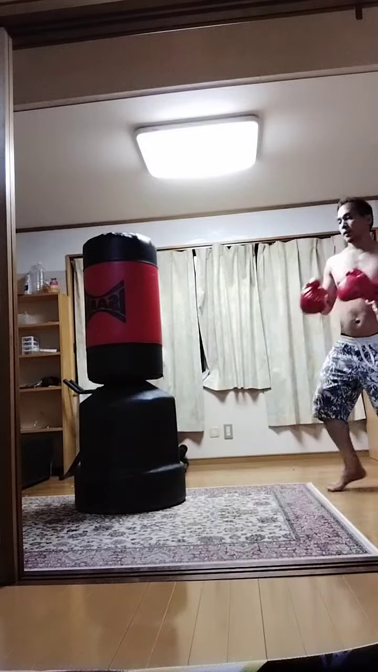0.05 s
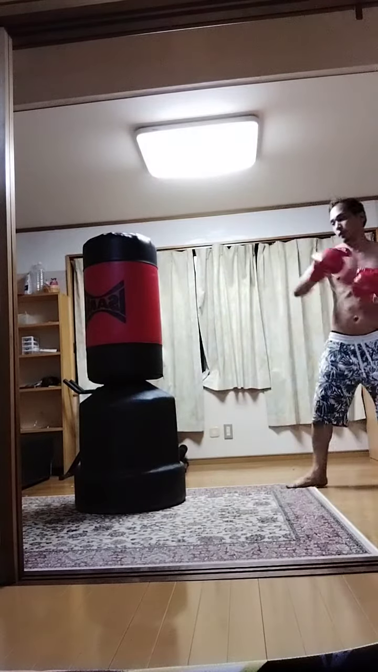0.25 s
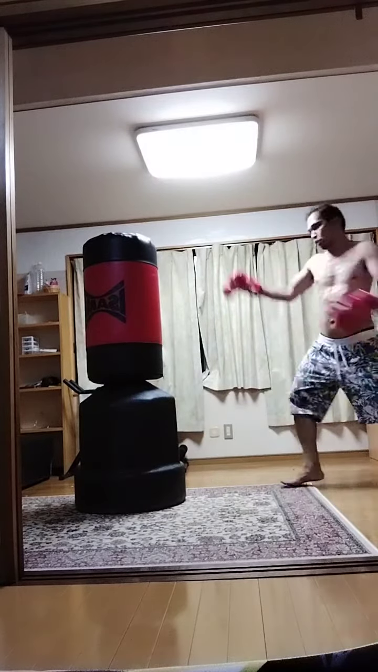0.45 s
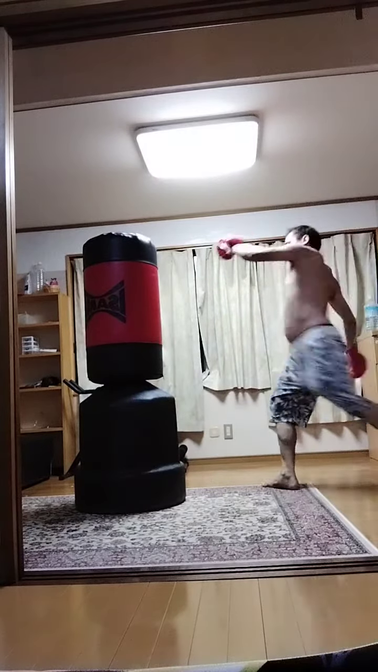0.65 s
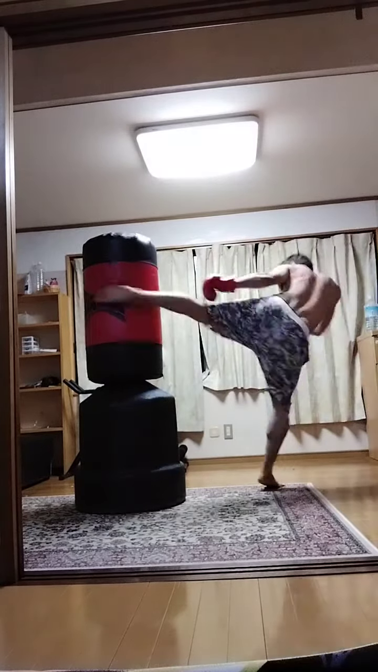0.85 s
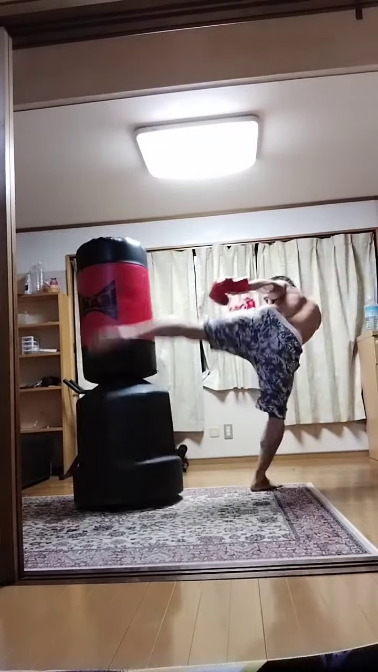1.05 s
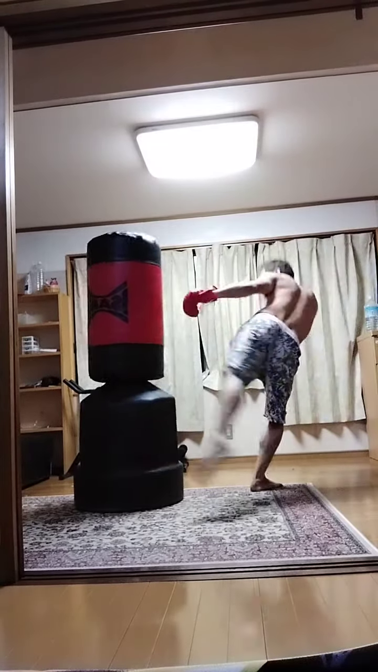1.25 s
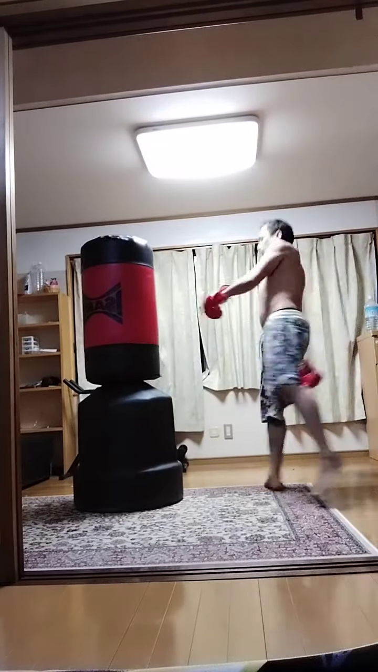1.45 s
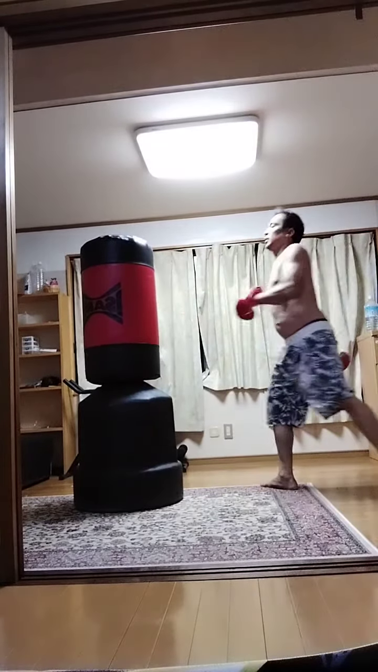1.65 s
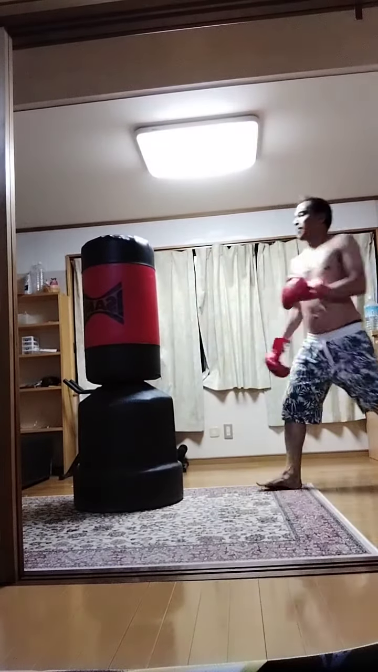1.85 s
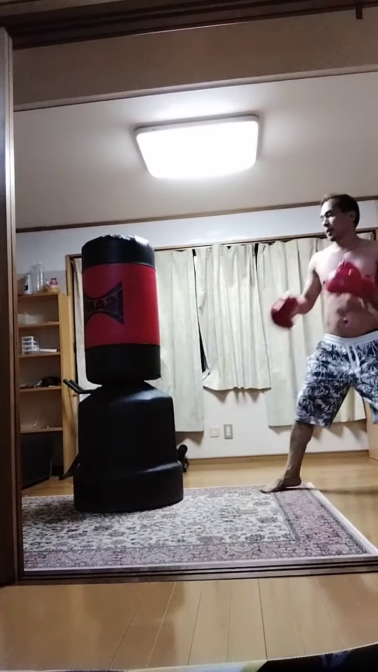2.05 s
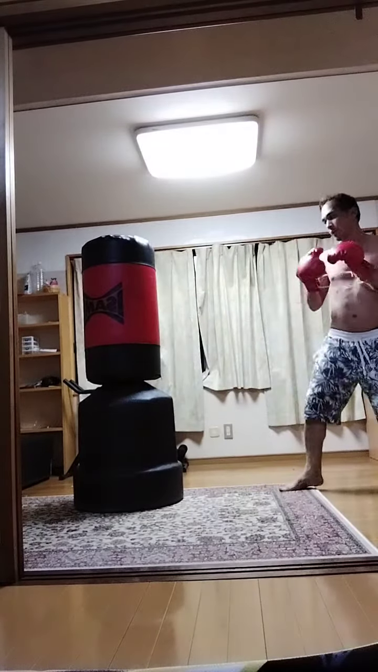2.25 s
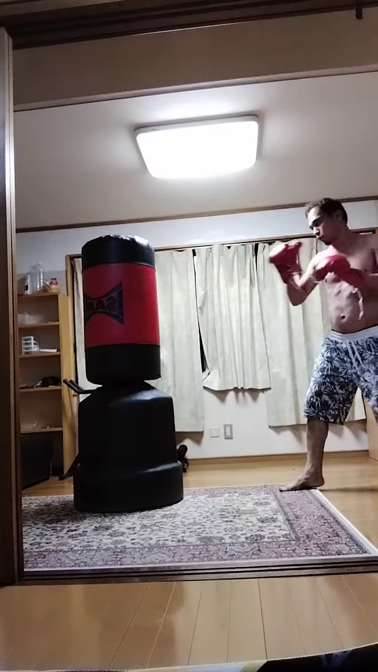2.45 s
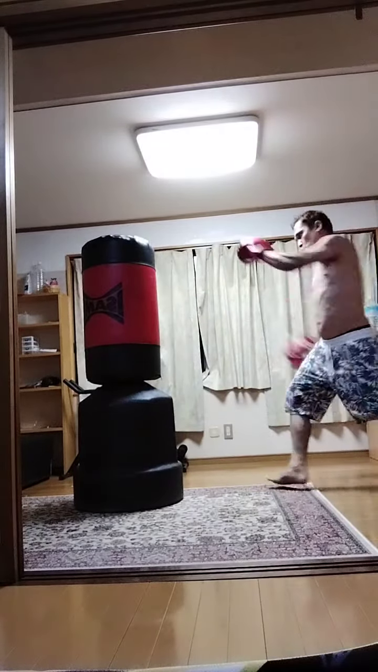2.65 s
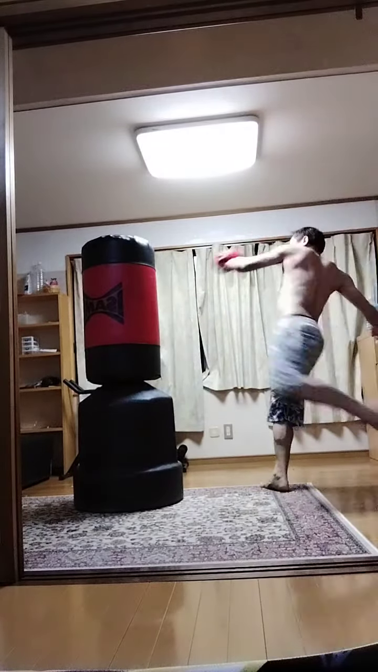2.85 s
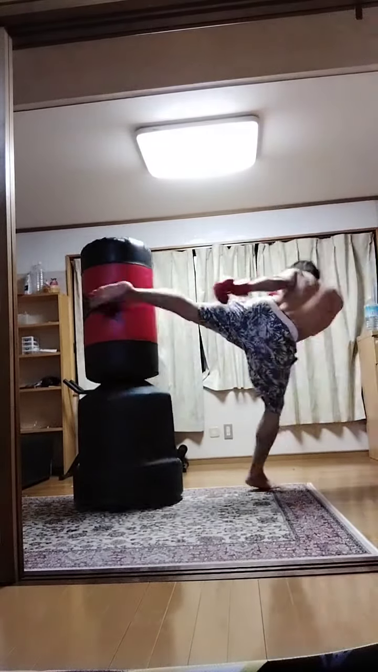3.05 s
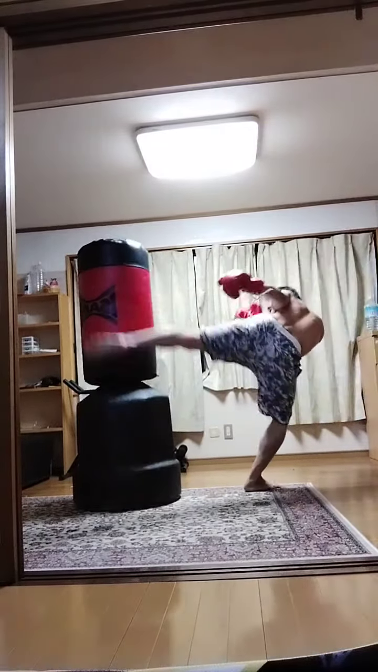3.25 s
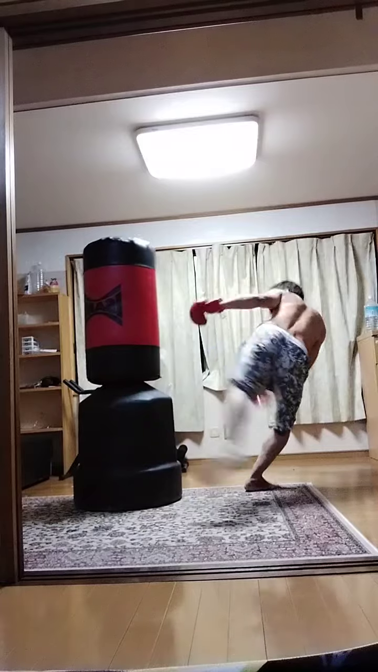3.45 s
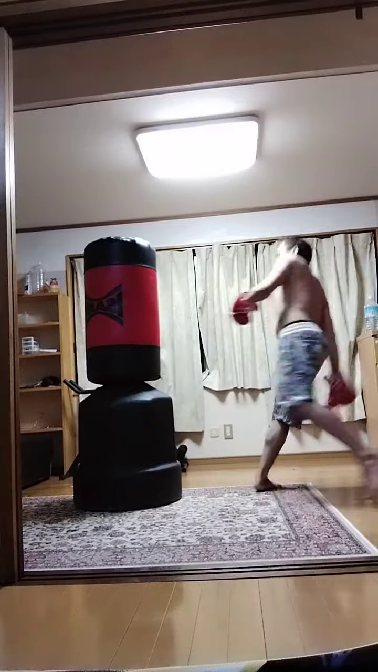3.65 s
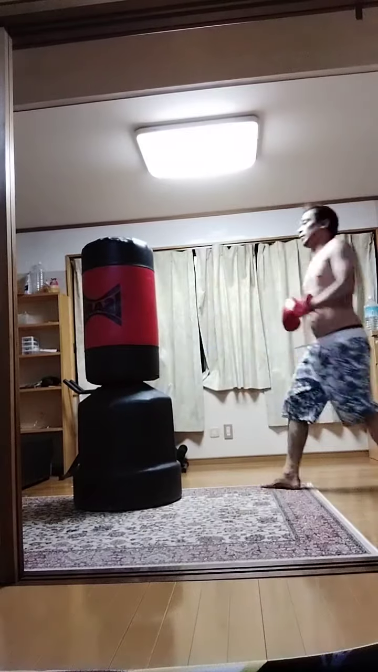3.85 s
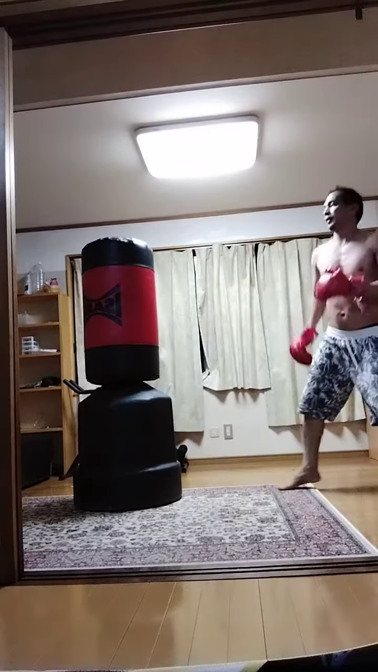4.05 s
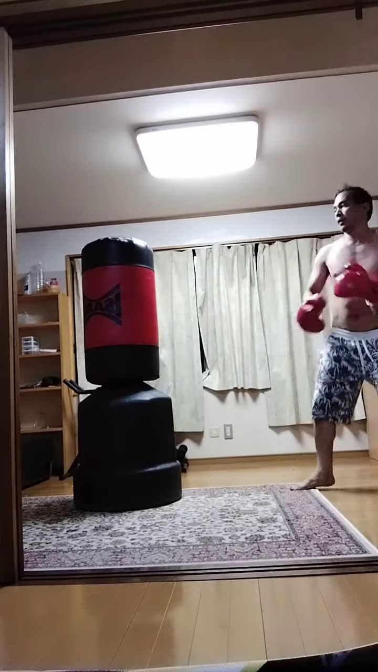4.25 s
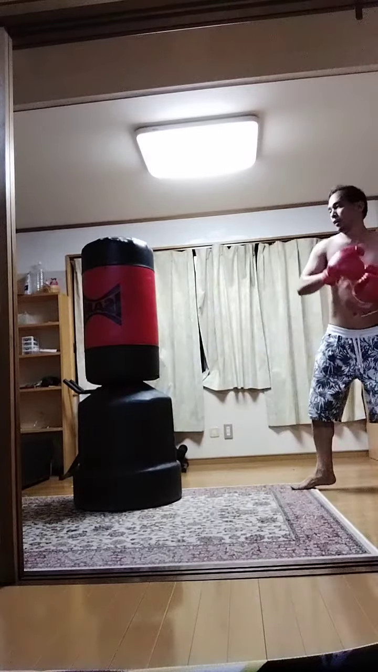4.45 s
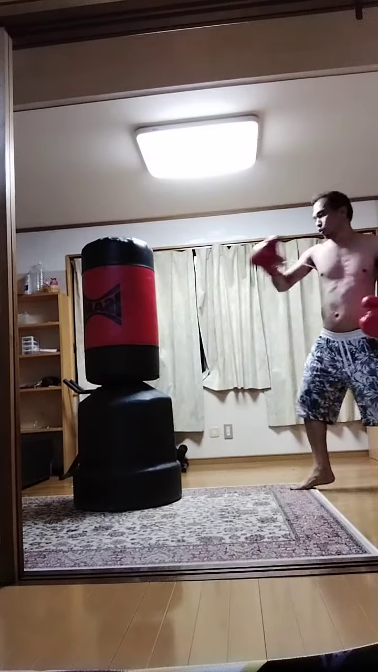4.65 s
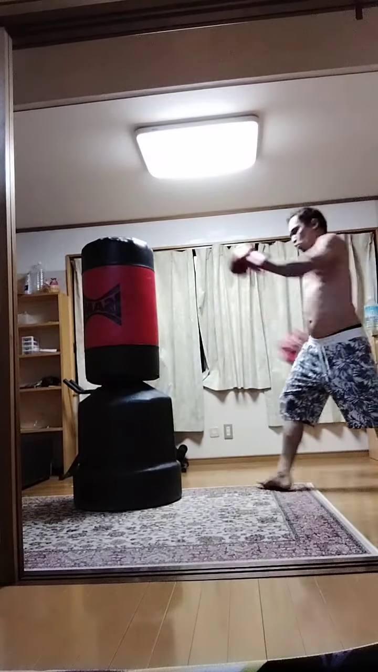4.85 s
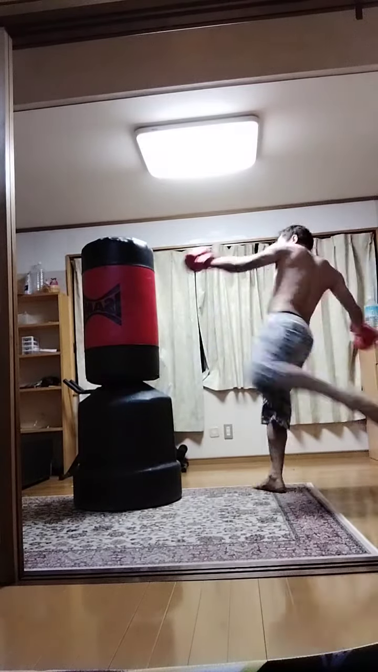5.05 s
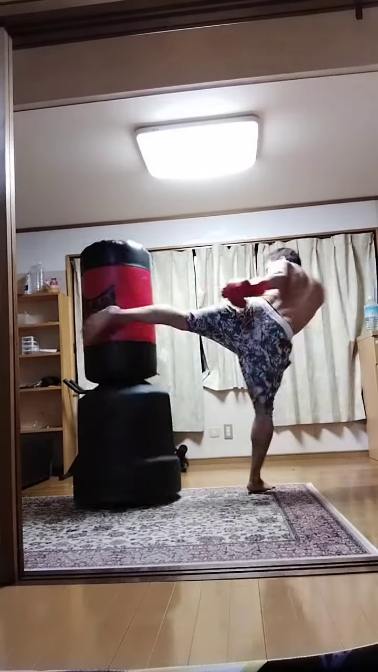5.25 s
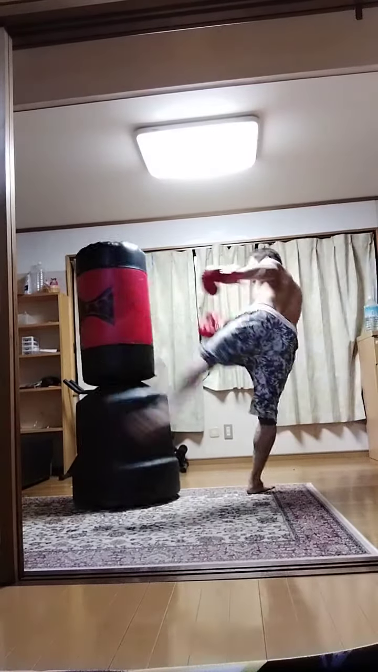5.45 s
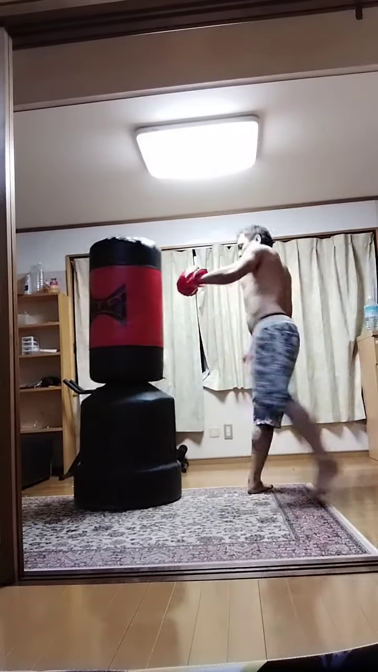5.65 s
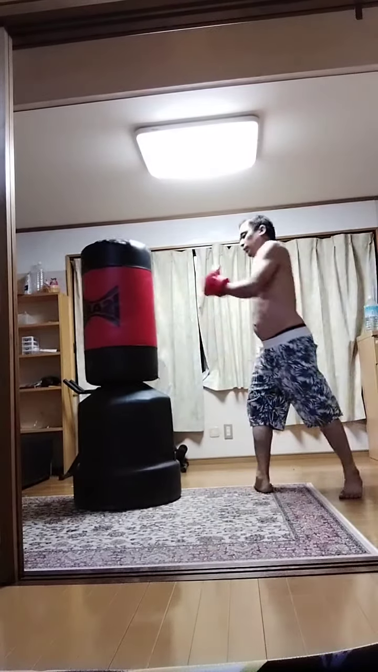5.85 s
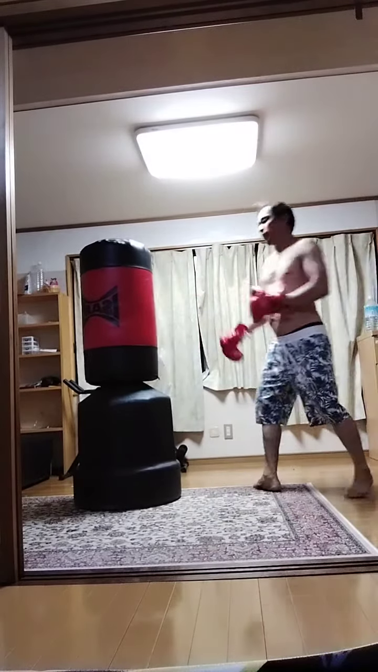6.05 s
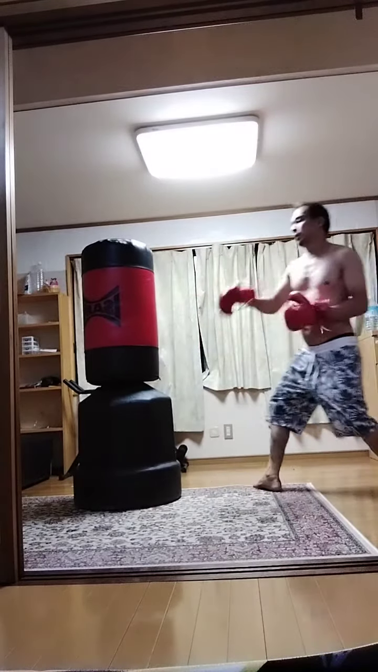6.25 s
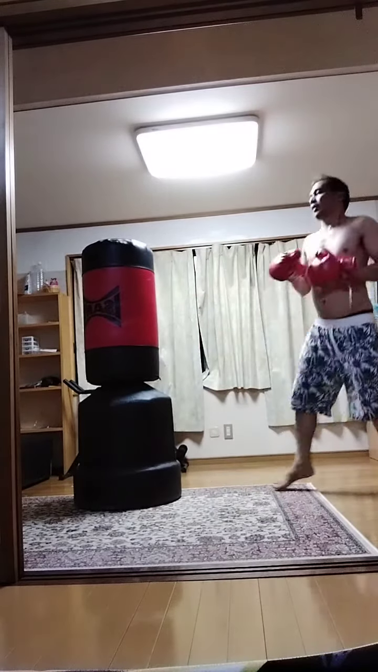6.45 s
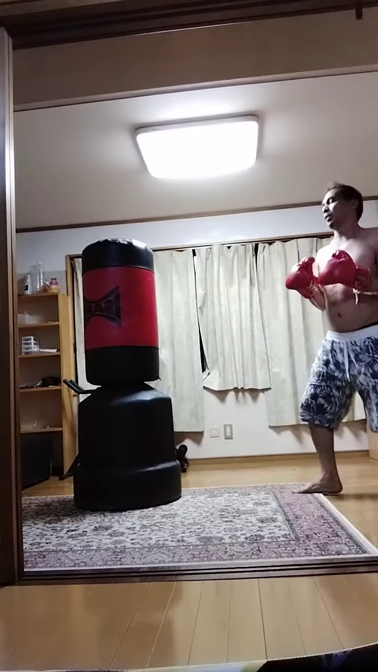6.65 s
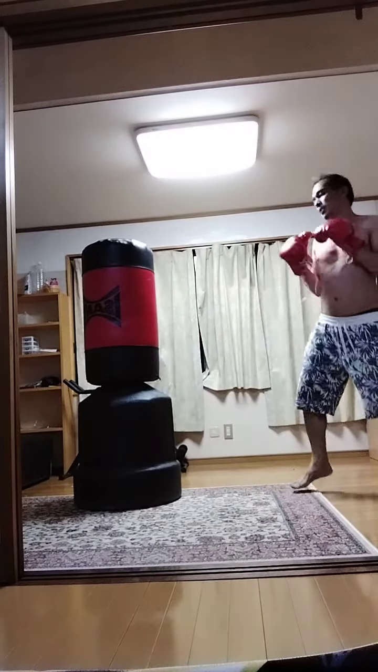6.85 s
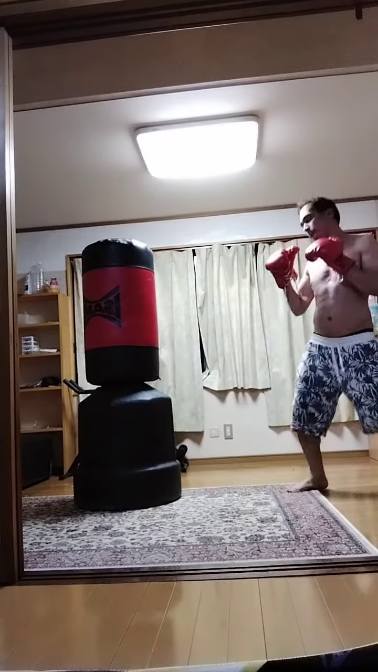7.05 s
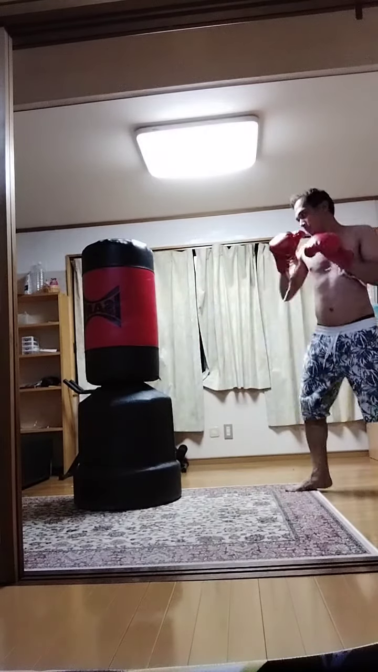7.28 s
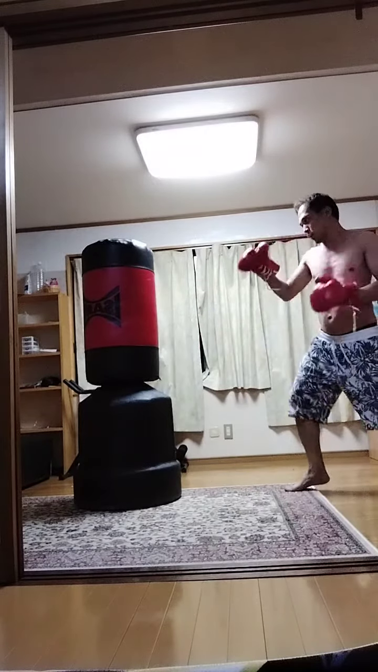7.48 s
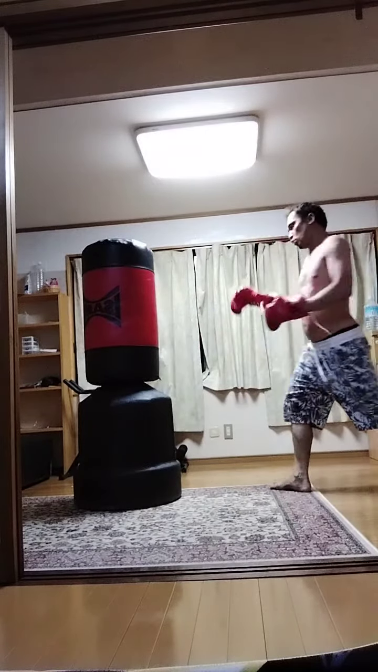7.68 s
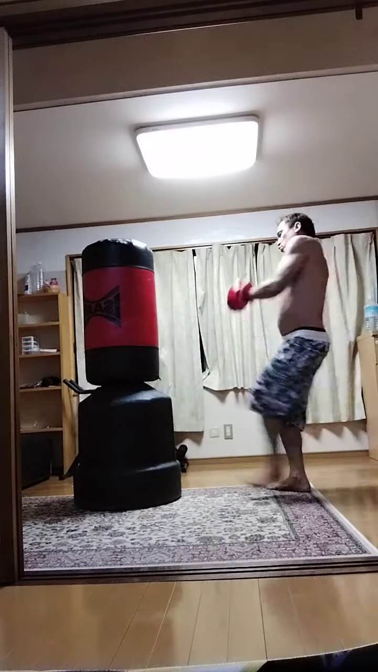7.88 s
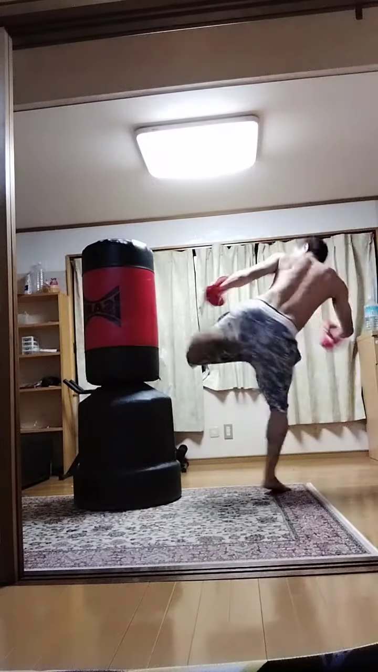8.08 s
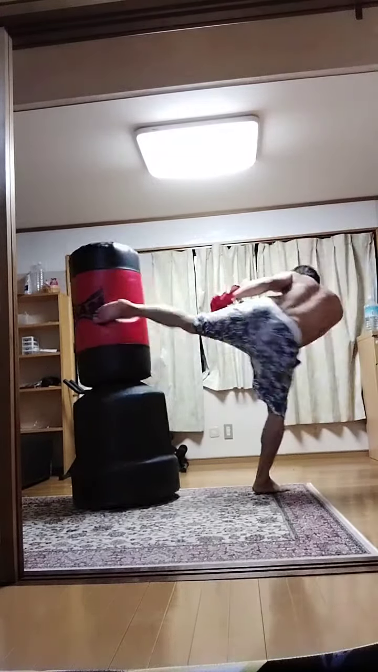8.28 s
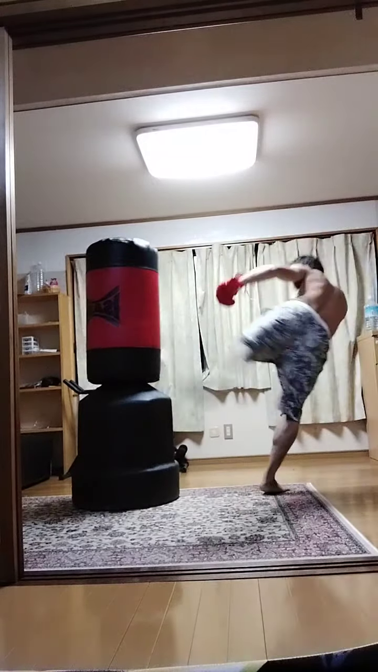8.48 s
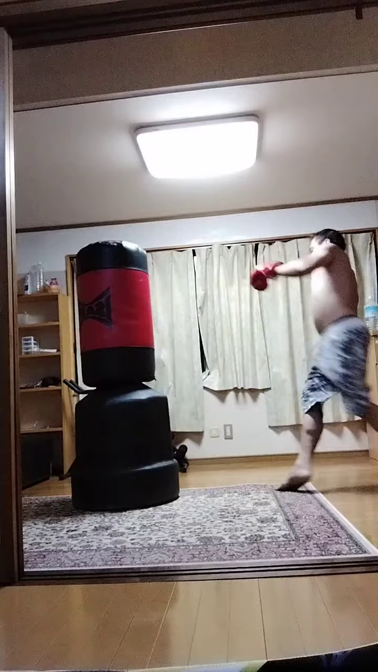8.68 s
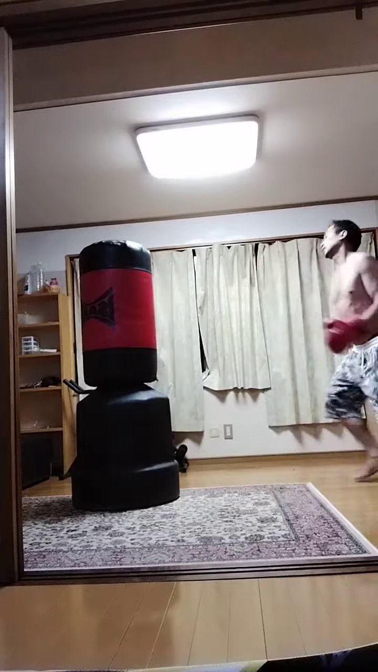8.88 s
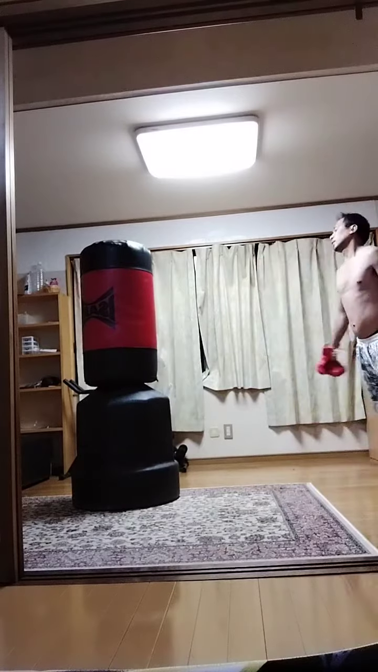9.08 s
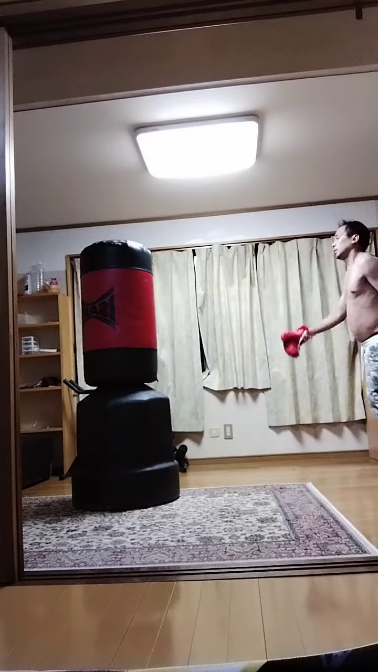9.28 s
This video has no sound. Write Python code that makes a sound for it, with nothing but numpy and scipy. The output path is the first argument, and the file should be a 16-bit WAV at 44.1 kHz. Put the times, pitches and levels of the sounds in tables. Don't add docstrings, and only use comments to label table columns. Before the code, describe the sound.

Four single kicks, about two to three seconds apart, crack against a padded vinyl bag with a low drumlike thump, a hollow base knock and a brief sandy hiss. Between them, quiet bare feet pad and scuff over boards and rug, joists murmur and cloth swishes. Just after the fourth kick a heavy foot pounds the floor, then small steps fade. Short room reverberation, heard from a phone on the floor.

```python
import sys
import numpy as np
from scipy import signal
from scipy.fft import rfft, irfft, next_fast_len
from scipy.io import wavfile
from scipy.ndimage import map_coordinates

SR = 44100
rng = np.random.default_rng(int(sys.argv[2]) if len(sys.argv) > 2 else 0)


def transcribe(u):
    v = np.clip(np.atleast_2d(u).T, -1, 1)
    q = np.round(v * 32767).astype(np.int16)
    wavfile.write(sys.argv[1], SR, q)


def amplitude_ratio(level_db):
    exponent = np.asarray(level_db, float) / 20
    return 10 ** exponent


N = 411004

KICK_TIMES = [
    .9553,
    3.1005,
    5.2836,
    8.2502,
]
# slap in dB, thump in dB, punch in dB, knock in dB, press of the foot in seconds.
KICKS = [
    (-8, -4, -11.5, -17, .06),
    (-7, -4.5, -8, -10, .066),
    (-6.5, -1, -4, -11, 0.046),
    (-7, -7, -6.5, -19, 0.015),
]
# time in seconds, peak in dB, edge in dB, life in seconds.
CONTACTS = [(0.9552, -7, -8, .004), (0.9593, 1.5, -18, .0014), (0.9725, -14, 4, .009),
            (3.1009, -6, -17.5, .004), (3.105, 1, -15, .002), (3.1145, -15, -16, .003),
            (3.122, -19, -3, .006), (5.2836, -5, -14, .0025), (5.289, -16, -2, .008), (5.301, -18, 0, .008),
            (5.397, -28, -22.5, .002), (8.2504, -6, -6, .008), (8.2525, -17, 1, .006),
            (8.269, -18, -5, .008)]
# time in seconds, peak in dB, note in Hz.
JOLTS = [
    (.9675, -7, 135),
    (3.1125, -5, 130),
    (5.2915, -9, 170),
    (5.3145, -7, 140),
    (5.3235, -5, 230),
    (8.2705, -12, 150),
]
# time in seconds, peak in dB, note in Hz, T60 in seconds.
CREASES = [(.9553, -14, 1010, .012), (.971, -24, 4300, .015), (.973, -19, 2450, .025),
           (.981, -21, 2700, .02), (.997, -22, 2300, .03), (1.008, -23, 3100, .02), (1.017, -20, 1740, .03),
           (1.029, -23, 2100, .035), (1.046, -25, 2350, .03), (3.1005, -16, 930, .015),
           (3.104, -13, 870, .02), (3.113, -22, 3640, .025), (3.116, -20, 2070, .03),
           (3.121, -20, 1300, .025), (3.13, -20, 2820, .035), (3.134, -19, 2340, .035),
           (3.168, -24, 2400, .03), (3.193, -26, 2200, .03), (5.2836, -13, 1000, .02),
           (5.284, -20, 2030, .015), (5.289, -22, 3670, .02), (5.3, -20, 3670, .03),
           (5.303, -23, 3210, .025), (5.315, -24, 1500, .025), (5.395, -23, 1135, .02),
           (8.2505, -15, 1100, .012), (8.251, -18, 3000, .015), (8.262, -22, 2330, .03),
           (8.266, -21, 4160, .03), (8.274, -23, 2850, .03), (8.286, -22, 1900, .035),
           (8.31, -25, 2650, .03)]
# frequency in Hz, width in Hz, level in dB.
BAG_MODES = [(62, 42, -11), (79, 42, -4), (120.3, 13, -4.5), (170, 29, 0.5), (232.5, 30, -4),
             (306, 13, -3.5)]
# frequency in Hz, width in Hz, level in dB.
PADDING_MODES = [(232, 57, 1), (259, 70, 2.5), (320, 55, 0.3), (417, 80, -9)]
# frequency in Hz, width in Hz, level in dB.
SHELL_MODES = [(505, 78, 2.5), (670, 150, 0), (950, 370, -1.5)]
# frequency in Hz, level in dB per Hz.
SLAP_COLOUR = [(240, -17.5), (400, -8.5), (588, -4.5), (655, -0.5), (801, -10.5), (1030, -13), (1530, -12),
               (2400, -8.5), (4800, -23), (6150, -27.5), (11200, -30), (16000, -32)]

# crest in seconds, hiss in dB, time to lose 10 dB in seconds, centre in Hz.
SLIDES = [
    (1.1, -31.5, .115, 6890),
    (3.285, -31.5, .14, 6000),
    (5.39, -26, .1, 6800),
    (8.37, -29.5, .12, 6900),
]
# frequency in Hz, level in dB per Hz.
GRAIN_COLOUR = [(1180, -43.5), (2000, -10.5), (3310, -6), (4650, -3), (5630, 0.5), (7310, -1.5), (8190, -3),
                (14500, -16.5), (16000, -33.5)]
# time in seconds, spread in seconds, level in dB, note in Hz.
WHISTLES = [
    (1.08, .022, -38, 7450),
    (5.405, .03, -31, 7430),
    (5.4, .025, -33, 4650),
    (8.35, .03, -37, 8300),
    (3.278, .02, -38, 6800),
]
# time in seconds, spread in seconds, level in dB.
RETURNS = [
    (1.36, .06, -60),
    (3.58, .06, -63),
    (5.67, 0.067, -52.5),
    (5.86, .05, -64),
]

# time in seconds, peak in dB, joist mode in Hz, plank in dB, T60 in seconds.
ADVANCE = [(0.001, -28, 150, -12, .3), (0.039, -26, 111, -16, 0.25), (0.569, -37, 113.7, -8, 0.28),
           (0.715, -24, 88.4, -13.5, 0.27), (2.49, -40, 125, 2, .3), (2.515, -34, 335, -8, 0.35),
           (2.553, -24.5, 118, -12, 0.23), (2.636, -27, 112, -7, 0.3), (2.685, -25, 170, -9, .18),
           (2.72, -15.5, 119, -15, 0.23), (2.88, -38, 118, -3, .4), (4.942, -33, 104, -6, 0.16),
           (5.04, -33, 88.8, -12.5, 0.21), (6.49, -41, 125, -11, .4), (6.646, -32, 153.3, -12, 0.21),
           (7.03, -34.5, 157.3, -12, 0.25), (7.06, -30, 86, -18, .22), (7.358, -33.5, 157.4, -16, 0.2),
           (7.42, -42, 120, -2, .15), (7.65, -42, 120, -8, .5), (7.832, -34.5, 137, -0.5, 0.2),
           (8.113, -31, 84.7, -10, 0.26)]
# time in seconds, peak in dB, joist mode in Hz, plank in dB, T60 in seconds.
RETREAT = [(1.239, -32, 89.6, -4, 0.14), (1.599, -43.5, 135, 1, 0.23), (1.691, -36, 120, -10, 0.2),
           (1.913, -23, 166.5, -16.5, 0.16), (2.037, -33.5, 85, -16, 0.16), (3.389, -31, 192, -2, 0.11),
           (3.561, -35.5, 129, -11.5, 0.23), (3.727, -38, 90, -5, 0.13), (3.885, -20.5, 154.7, -20, 0.18),
           (3.965, -22.5, 88, -22, 0.2), (4.155, -42, 125, -1, .2), (4.3, -32, 108.7, -18, 0.18),
           (5.579, -32, 83, -12, 0.32), (5.908, -31, 129, -11, 0.11), (5.977, -38.5, 171, 5, 0.13),
           (6.24, -24, 95.7, -6, 0.28), (6.259, -21, 165, -14, .25), (8.524, -30, 75.4, 0, 0.25),
           (8.778, -8, 100, -17, 0.2), (8.919, -22, 142.3, -18, 0.2), (8.999, -27, 98, -17, 0.25),
           (9.075, -35, 95, -10, .2), (9.16, -40, 88, -12, .25)]
# time in seconds, peak in dB, joist mode in Hz, plank in dB, T60 in seconds.
HEELS = [
    (0.326, -25.5, 95, -17, 0.26),
    (1.429, -26, 178, -7.5, 0.088),
    (5.784, -24, 135, -12.5, 0.099),
    (6.11, -30, 113, -5, 0.12),
    (8.824, -7, 125, -20, .1),
    (8.8385, 2, 135, -27, 0.07),
    (8.857, -1, 131, -20, 0.11),
    (8.881, -2, 112, -21.5, 0.07),
]
# frequency in Hz, width in Hz, level in dB.
JOIST_MODES = [(69.75, 10, 3), (86.7, 24, 1), (108, 14, -10), (146.9, 25, 0.5)]
# frequency in Hz, width in Hz, level in dB.
PLANK_MODES = [(197, 56.3, 0), (253, 35.2, 3.5), (337.2, 39.7, -1.5), (478, 70, -8), (623, 210, -13)]
# floor rumble in dB, knock in dB, cover rustle in dB, brightness in dB.
ROCKING = [
    (-37, -5, -42, 4),
    (-38, -2, -40, 4),
    (-35, -3, -43, 5),
    (-46, -4, -45, 8),
]
# time in seconds, peak in dB, note in Hz, T60 in seconds.
RAPS = [(.326, -43, 700, .02), (.742, -43, 470, .03), (1.202, -43, 690, .025), (1.244, -44, 720, .025),
        (1.43, -39, 680, .03), (1.588, -46, 520, .04), (1.71, -52, 640, .02), (2.081, -48, 600, .03),
        (2.826, -45, 550, .03), (2.867, -38, 655, .035), (3.062, -50, 600, .03), (3.569, -53, 4900, .01),
        (3.73, -46, 640, .04), (4.155, -46, 620, .03), (5.024, -43, 540, .03), (5.578, -42, 505, .03),
        (5.795, -29, 175, .035), (5.797, -39, 720, .025), (5.825, -46, 710, .03), (5.902, -45, 500, .025),
        (5.979, -47, 900, .02), (6.005, -48, 610, .03), (6.113, -44, 930, .02), (6.243, -42, 400, .03),
        (6.256, -46, 530, .03), (6.549, -58, 5500, .008), (7.829, -47, 485, .03), (7.88, -43, 590, .035),
        (8.53, -43, 700, .025), (8.769, -41, 850, .02), (8.801, -32, 330, .04), (8.834, -36, 480, .03),
        (8.848, -46, 900, .03), (8.883, -30, 300, .04)]

# start in seconds, level in dB, drag in seconds, brightness in dB.
SCUFFS = [(0, -55, .07, -7), (.205, -62, .02, -3), (.33, -70, .02, -12), (.55, -59, .06, -4),
          (1.484, -51, .05, -10), (2.07, -58, .04, -12), (2.64, -55, .06, -13), (2.846, -51, .04, -1),
          (2.7, -60, .04, -2), (3.695, -61, .05, -9), (4.155, -49, .08, -6), (4.48, -72, .03, -4),
          (4.93, -60, .03, -6), (6.1, -64, .03, -8), (6.237, -62, .04, -8), (.7, -59, .05, -9),
          (6.545, -62, .07, -4), (6.72, -54.5, .06, -11), (6.958, -58, .04, -7), (1.83, -63, .08, -13),
          (7.345, -64, .03, -8), (8.035, -58, .04, -11), (8.105, -57, .09, -7), (8.7, -60, .04, -8),
          (8.783, -49, .03, -16), (9.12, -63, .06, -7)]
# crest in seconds, level in dB, time to swell 10 dB in seconds, brightness in dB.
SWISHES = [(.74, -51, .04, -8), (.92, -60, .12, -8), (.95, -57, .03, -6), (1.36, -58, .12, -4),
           (1.88, -64, .1, -14), (2, -63, .1, -10), (2.25, -62, .05, -6), (2.55, -64, .05, -17),
           (2.79, -61, .05, -6), (2.97, -61, .04, -4), (7.15, -67, .08, -7), (3.08, -59, .07, -12),
           (3.097, -57, .02, -6), (3.58, -60, .1, -3), (3.86, -62, .1, -10), (3.975, -59, .03, -8),
           (4.09, -62, .05, -10), (4.83, -68, .05, -6), (5.055, -48, .045, -9), (5.25, -61, .08, -10),
           (5.27, -61, .03, -9), (5.68, -49, .12, -1), (5.92, -55, .15, -5), (6.0, -60, .05, -9),
           (6.26, -65, .05, -14), (6.42, -69, .1, -12), (6.66, -60, .07, -10), (6.88, -61, .1, -12),
           (7.28, -63, .05, -7), (7.46, -66, .07, -8), (7.71, -68, .1, -8), (7.845, -51, .035, -8),
           (8.23, -57, .1, -8), (8.855, -44, .05, -18), (9.3, -65, .08, -5)]
# frequency in Hz, level in dB per Hz.
CLOTH_COLOUR = [(290, -33.5), (500, -4.5), (742, -7.5), (1020, -8.5), (1400, -12), (2300, -5), (3200, -9.5),
                (4200, -16.5), (6000, -25), (7800, -49.5), (13200, -120)]
# frequency in Hz, level in dB per Hz.
SHEEN_COLOUR = [(2350, -32.5), (4000, -5.5), (4340, -9), (6860, -6), (11400, -10.5), (16000, -19.5)]
# time in seconds, peak in dB, knock in dB, edge in dB.
TICKS = [(0.3279, -51, 14, -35), (0.5537, -39, -13, -18), (1.433, -39, 0, -7), (1.4858, -33, -8, -15),
         (1.711, -57, 15, 2), (2.6389, -34, -12.5, -31), (2.6694, -33.5, -12.5, -46),
         (2.8469, -31, -13.5, -17), (3.5683, -62, 15, 6), (3.696, -44, 3, -28), (4.1573, -44, -39, 4),
         (4.481, -35, -30, -11), (4.5516, -43, -22.5, -11), (5.7963, -55, 23, -20), (6.114, -56, 15.5, -20),
         (6.5738, -49, -22.5, 3), (7.8082, -48, -12.5, -18), (8.0409, -40, -15, -25),
         (8.1043, -34, -14, -25), (8.5302, -36, -6.5, -12.5), (8.7699, -40, 8, -41)]
# time in seconds, peak in dB.
SNAPS = [(.07, -56), (1.711, -54), (2.695, -56), (2.847, -46), (2.933, -51), (3.569, -56), (4.157, -45),
         (4.165, -50), (4.492, -52), (4.563, -56), (6.574, -48), (2.036, -60), (2.234, -54), (2.476, -56),
         (6.237, -55), (6.357, -58), (6.376, -61), (6.514, -59), (6.728, -53), (7.8, -58), (1.43, -50),
         (1.487, -46), (8.77, -50), (8.041, -53), (6.958, -57)]
# frequency in Hz, width in Hz, level in dB.
TAP_MODES = [(310, 260, 2), (560, 212, 2.5), (833, 204, -7.5)]

# frequency in Hz, level in dB per Hz.
QUIET_COLOUR = [(15, -43.5), (25, -7.5), (59, -0.5), (127, -1), (344, -13.5), (405, -17), (754, -24),
                (1260, -24), (2410, -29), (3080, -27), (4140, -41), (7510, -48.5), (11900, -40.5),
                (16000, -52.5)]
# frequency in Hz, T60 in seconds.
ROOM_T60 = [(35, .45), (70, 0.8), (200, 0.24), (500, 0.32), (2000, 0.37), (5000, 0.28), (12000, 0.23)]
# frequency in Hz, left-right correlation.
LIKENESS = [(30, .84), (70, 0.985), (290, 0.98), (640, 0.6), (1400, .3), (15000, 0.1)]
# frequency in Hz, left minus right in dB.
PORT_DB = [(60, -1), (130, -1.0), (290, -1.8), (640, -2.2), (1410, 3.2), (3100, 5), (6820, 9.5), (15000, 7)]
# frequency in Hz, lead of the left port in radians.
PORT_LEAD = [(60, 0), (140, .22), (280, .42), (560, 1.1), (1600, 1.2), (4400, 1.7)]

DRUM_HZ, THUMP_LOW_HZ = 192, 28
JOLT_T60_S, CONTACT_EDGE_WET_DB = .03, -6
SLIDE_RISE, SAG_HZ_PER_DB = .65, 50
SOLE_S, HEEL_S, HEEL_MURMUR_DB = .013, .006, -5
MURMUR_DB, MURMUR_DELAY_S, MURMUR_RISE_S, MURMUR_HOLD_S = -15, .025, .03, .02
MURMUR_LASTS, RATTLE_LASTS = 2.4, 2.2
ROCK_DELAY_S, ROCK_RUMBLE_DB_PER_S = .13, 30
ROCK_RUSTLE_DB_PER_S, ROCK_SHEEN_DB_PER_S = 75, 90
SCUFF_ATTACK_S, RUSTLE_DB_PER_S = .008, 150
EDGE_WET, SHEEN_HOLDS = .5, .55
WALLS_S, WALLS_DB = .06, -6
QUIET_DB = -52
TOP_HZ = 15900


def unit(x):
    return x / np.sqrt(np.mean(x ** 2) + 1e-20)


def peak(x):
    return x / np.abs(x).max()


def along(points, hz):
    f, v = np.transpose(points)
    return np.interp(np.log(hz + 1), np.log(f + 1), v)


def wobble(rate, size=N):
    coarse = np.arange(0, size + 32, 32)
    knots = rng.standard_normal(int(size * rate / SR) + 4)
    return np.interp(np.arange(size), coarse, map_coordinates(knots, [coarse * rate / SR]))


def filtered(x, response):
    m = next_fast_len(x.shape[-1] + 8192)
    return irfft(rfft(x, m) * response(np.fft.rfftfreq(m, 1 / SR)), m)[..., :x.shape[-1]]


def modes(table):
    def response(f):
        total = 0
        for k, (centre, width, db) in enumerate(table):
            damping = 1j * f * width
            total = total + (-1) ** k * amplitude_ratio(db) * damping / (centre * centre - f * f + damping)
        return total
    return response


def colour(spectrum):
    return lambda hz: amplitude_ratio(along(spectrum, hz))


def causal(spectrum):
    def response(hz):
        cepstrum = irfft(np.log(amplitude_ratio(along(spectrum, hz)) + 1e-6))
        half = len(cepstrum) // 2
        fold = np.r_[1, np.full(half - 1, 2), 1, np.zeros(len(cepstrum) - half - 1)]
        return np.exp(rfft(cepstrum * fold))
    return response


def walls(response):
    echo = amplitude_ratio(-60 * np.arange(SR // 10) / SR / WALLS_S) * rng.standard_normal(SR // 10)
    echo = amplitude_ratio(WALLS_DB) * echo / np.linalg.norm(echo)
    return lambda hz: response(hz) * np.abs(1 + rfft(echo, 2 * len(hz) - 1))


def diffuse(pair, response=lambda hz: 1):
    def spread(hz):
        turn = np.arccos(np.clip(along(LIKENESS, hz), -1, 1)) / 2
        return response(hz) * np.array([np.cos(turn), np.sin(turn)])
    mid, side = filtered(pair, spread)
    return np.array([mid + side, mid - side])


def noise(response, grain_db=0):
    white = rng.standard_normal((2, N)) * amplitude_ratio(grain_db * (.4 * wobble(40) + wobble(220)))
    return unit(diffuse(white, response))


def add(x, part, start):
    room = min(part.shape[1], x.shape[1] - start)
    x[:, start:start + room] += part[:, :room]
    return x


def place(x, s, direct, wet_db):
    hz, t, z = signal.stft(rng.standard_normal((2, SR // 2)), SR, nperseg=512)
    tail = signal.istft(z * amplitude_ratio(-60 * t / along(ROOM_T60, hz)[:, None]), SR, nperseg=512)[1]
    build_up = 1 - np.exp(-np.arange(tail.shape[1]) / SR / 0.0089)
    tail = diffuse(tail * build_up)
    tail = tail / np.linalg.norm(tail[0])
    heard = amplitude_ratio(wet_db) * signal.fftconvolve(np.atleast_2d(direct)[:1], tail, axes=1)
    heard[:, :direct.shape[-1]] += direct
    return add(x, heard, round(s * SR))


def crack(n, life, step=1):
    wake = 0.25 * amplitude_ratio(-60 * np.arange(n) / SR / life) * rng.standard_normal(n)
    return wake - step * (np.arange(n) == 0)


def rings(table, wet_db):
    dry, t = np.zeros((1, N)), np.arange(SR // 16) / SR
    for s, db, hz, t60 in table:
        rough = 1 + .3 * wobble(400, size=len(t))
        envelope = amplitude_ratio(db - 60 * t / t60) * (1 - np.exp(-t / .0004))
        note = -envelope * rough * np.sin(2 * np.pi * hz * t)
        dry = add(dry, note[None], round(s * SR))
    return place(np.zeros((2, N)), 0, dry, wet_db)


def strokes(s, db, rise, hold, fall):
    column = lambda v: np.reshape(v, (-1, 1))
    late = np.arange(0, N / SR + .002, .001) - column(s)
    level = column(db) + 10 * np.minimum(late, 0) / column(rise)
    level = level - column(fall) * np.maximum(late - column(hold), 0)
    envelope = np.sqrt(np.sum(amplitude_ratio(level) ** 2, axis=0))
    return np.interp(np.arange(N) / SR * 1000, np.arange(late.shape[1]), envelope)


def kicks():
    out, t = np.zeros((2, N)), np.arange(SR // 3) / SR
    push = -t / .0009 * np.exp(-t / 0.00095)

    def held(press, life):
        lumps = amplitude_ratio(4.8 * wobble(130.2, size=len(t))) * diffuse(rng.standard_normal((2, len(t))))
        return (1 - np.exp(-t / .003)) * amplitude_ratio(-60 * np.maximum(t - press, 0) / life - 64 * t) * lumps

    for s, (slap_db, thump_db, punch_db, knock_db, press) in zip(KICK_TIMES, KICKS):
        bag = peak(filtered(push, modes(BAG_MODES)))
        drum = peak(filtered(push, modes([(DRUM_HZ, 30, 0)])))
        shove = peak(filtered(push, modes([(210, 1200, 0)])))
        thump = peak(.6 * bag + .48 * drum + .9 * shove)
        thump = filtered(thump, lambda f: (1j * f / (THUMP_LOW_HZ + 1j * f)) ** 2)
        out = place(out, s, amplitude_ratio(thump_db + 1.5) * thump, wet_db=-2.5)
        punch = peak(filtered(held(press, .12), modes(PADDING_MODES)))
        knock = peak(filtered(held(press, .13), modes(SHELL_MODES)))
        crease = peak(filtered(held(press, .1) * amplitude_ratio(-100 * t), causal(SLAP_COLOUR)))
        blow = amplitude_ratio(punch_db - 1.5) * punch + amplitude_ratio(knock_db + 1.5) * knock + amplitude_ratio(slap_db - 5) * crease
        out = place(out, s, blow, wet_db=-6)
    return out + contacts() + rings([(*row, JOLT_T60_S) for row in JOLTS], wet_db=-4)


def contacts():
    out = np.zeros((2, N))
    for s, db, edge_db, life in CONTACTS:
        step = np.clip(.0012 / life, 0, 1)
        body = peak(filtered(crack(SR // 40, life, step), causal(SLAP_COLOUR)))
        edge = peak(filtered(crack(SR // 40, life, step), causal(SHEEN_COLOUR)))
        out = place(out, s, amplitude_ratio(db) * (body + amplitude_ratio(edge_db + CONTACT_EDGE_WET_DB) * edge), wet_db=1.5)
        out = add(out, amplitude_ratio(db + edge_db - 4) * edge[None], round(s * SR))
    return out


def filling():
    t, slide, high = np.arange(N) / SR, np.zeros(N), np.zeros(N)
    for kick, (s, db, length, centre_hz) in zip(KICK_TIMES, SLIDES):
        loss_db = 10 * np.abs((t - s) / np.where(t < s, SLIDE_RISE * length, length)) ** 1.95
        slide += (t > kick) * amplitude_ratio(db - 1.5 - loss_db)
        high += np.clip((centre_hz - SAG_HZ_PER_DB * loss_db - 4500) / 3500, 0, 1)
    low_crest, high_crest = noise(modes([(4650, 440, 0)])), noise(modes([(7400, 390, 0)]))
    crest = np.sqrt(1 - high) * low_crest + np.sqrt(high) * high_crest
    return slide * unit(noise(walls(colour(GRAIN_COLOUR)), grain_db=1.3) + 0.4 * crest)


def whistles():
    out, t = np.zeros((2, N)), np.arange(SR // 5) / SR - .1
    for s, spread, db, hz in WHISTLES:
        note = np.array([wobble(260, size=len(t)) * np.sin(2 * np.pi * hz * t + turn) for turn in (0, 1)])
        out = add(out, amplitude_ratio(db) * np.exp(-(t / spread) ** 2) * note, round((s + t[0]) * SR))
    return out


def settling():
    t = np.arange(N) / SR
    swell = sum(amplitude_ratio(db) * np.exp(-((t - s) / spread) ** 2) for s, spread, db in RETURNS)
    fine = modes([(12500, 5000, 0)])
    return swell * noise(lambda hz: fine(hz) ** 2)


def steps():
    out, t = np.zeros((2, N)), np.arange(SR // 3) / SR
    joists, planks = modes(JOIST_MODES), modes(PLANK_MODES)
    floor = lambda f: np.array([joists(f), planks(f) / (1 + 1j * f / 700) ** 2])
    falls = [(*row, SOLE_S) for row in ADVANCE + RETREAT] + [(*row, HEEL_S) for row in HEELS]
    for s, db, hz, plank_db, t60, landing in falls:
        swell = peak((1 - np.exp(-t / landing)) ** 2 * amplitude_ratio(-60 * t / t60))
        others, wood = filtered(swell * rng.standard_normal((2, len(t))), floor)
        fall = -swell * np.sin(2 * np.pi * hz * t) + 0.12 * peak(others) + amplitude_ratio(plank_db - .6) * peak(wood)
        out = add(out, amplitude_ratio(db - 3.5) * np.array([fall, fall]), round(s * SR))
    return out


def boards():
    s, db, _, plank_db, t60 = np.transpose(ADVANCE + RETREAT + HEELS)
    db[-len(HEELS):] += HEEL_MURMUR_DB
    rock_db, knock_db = np.transpose(ROCKING)[:2]

    def stir(level, lasts):
        fall = 60 / (lasts * t60)
        return strokes(s + MURMUR_DELAY_S, level + MURMUR_DB, MURMUR_RISE_S, MURMUR_HOLD_S, fall)

    def rock(level):
        return strokes(np.add(KICK_TIMES, ROCK_DELAY_S), level - 5, .03, 0, ROCK_RUMBLE_DB_PER_S)

    joists, planks = modes(JOIST_MODES), modes(PLANK_MODES)
    rumble = noise(lambda hz: joists(hz) * hz ** 2 / (hz ** 2 + 45 ** 2) / (1 + (hz / 220) ** 4))
    rattle = noise(lambda hz: planks(hz) * hz ** 2 / (hz ** 2 + 170 ** 2) / (1 + (hz / 650) ** 4), grain_db=1)
    low = (stir(db, MURMUR_LASTS) + rock(rock_db)) * rumble
    return low + (stir(db + plank_db + 5.5, RATTLE_LASTS) + rock(rock_db + knock_db + 4)) * rattle


def rustle():
    start, scuff_db, drag, scuff_bright = np.transpose(SCUFFS)
    crest, swish_db, swell, swish_bright = np.transpose(SWISHES)
    cover_db, cover_bright = np.transpose(ROCKING)[2:]

    def stroke(share, fade):
        scuff = strokes(start + SCUFF_ATTACK_S, scuff_db + share * (scuff_bright + 1.5), SCUFF_ATTACK_S,
                        drag * SHEEN_HOLDS ** share, RUSTLE_DB_PER_S)
        swish = strokes(crest, swish_db + share * swish_bright, swell, .02, RUSTLE_DB_PER_S)
        cover = strokes(np.add(KICK_TIMES, ROCK_DELAY_S), cover_db + share * cover_bright, .03, 0, fade)
        return scuff + swish + cover

    dull = stroke(0, ROCK_RUSTLE_DB_PER_S) * noise(walls(colour(CLOTH_COLOUR)), grain_db=1.2)
    bright = stroke(1, ROCK_SHEEN_DB_PER_S) * noise(walls(colour(SHEEN_COLOUR)), grain_db=1.5)
    return amplitude_ratio(.4) * (dull + amplitude_ratio(-2.6) * bright)


def ticks():
    out = np.zeros((2, N))
    dry_snap = lambda hz: causal(CLOTH_COLOUR)(hz) * modes([(2000, 3200, 0)])(hz)
    responses = (dry_snap, modes(TAP_MODES), causal(SHEEN_COLOUR))
    for s, db, knock_db, edge_db in TICKS:
        body, wood, edge = (peak(filtered(crack(SR // 20, 0.006), r)) for r in responses)
        tick = body + amplitude_ratio(knock_db + 1) * wood + EDGE_WET * amplitude_ratio(edge_db) * edge
        out = place(out, s, amplitude_ratio(db - 1.5) * tick, wet_db=5)
        out = add(out, amplitude_ratio(db + edge_db - 3) * edge[None], round(s * SR))
    for s, db in SNAPS:
        snap = peak(filtered(crack(SR // 100, .004), causal(SHEEN_COLOUR)))
        out = add(out, amplitude_ratio(db) * snap[None], round(s * SR))
    return out


def quiet():
    return amplitude_ratio(QUIET_DB - 7 + .8 * wobble(2.1)) * noise(colour(QUIET_COLOUR))


def scene():
    bag = kicks() + rings(CREASES, wet_db=-3) + filling() + whistles() + settling()
    floor = steps() + boards() + rings(RAPS, wet_db=0)
    return bag + floor + rustle() + ticks() + quiet()


def top_cut(x):
    return signal.sosfilt(signal.butter(12, 17030, fs=SR, output="sos"), x)


def record(dry):
    sides = np.array([[.5], [-.5]])
    x = filtered(dry, lambda hz: amplitude_ratio(along(PORT_DB, hz) * sides) * np.exp(1j * along(PORT_LEAD, hz) * sides))
    x = x / (1 + np.abs(x / 0.88) ** 4) ** (1 / 4)
    mix = filtered(x, lambda hz: hz < TOP_HZ)
    return top_cut(mix)


dry = scene()
out = record(dry)
transcribe(out)
```